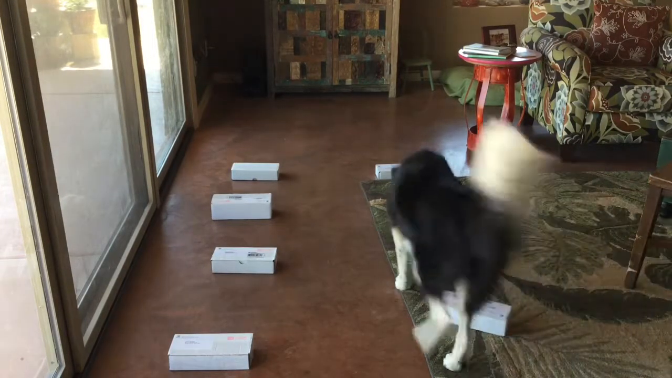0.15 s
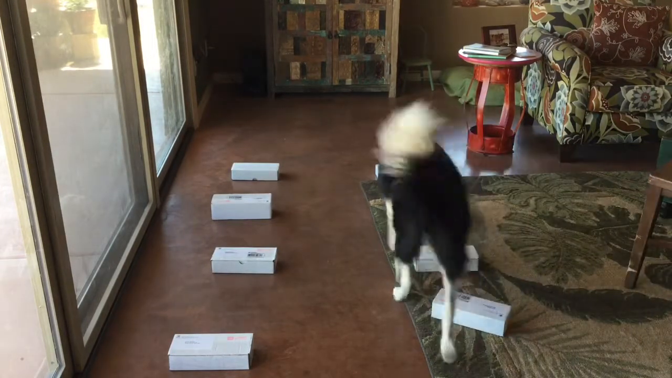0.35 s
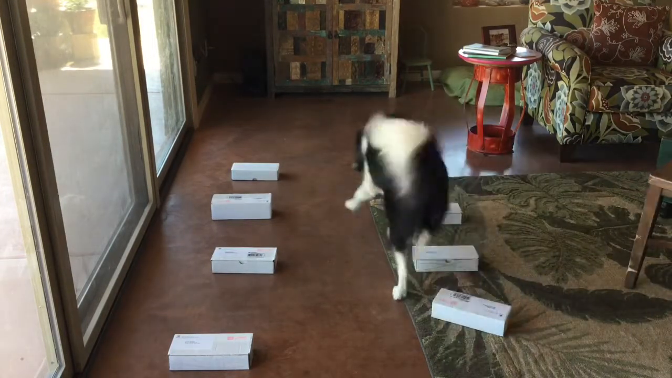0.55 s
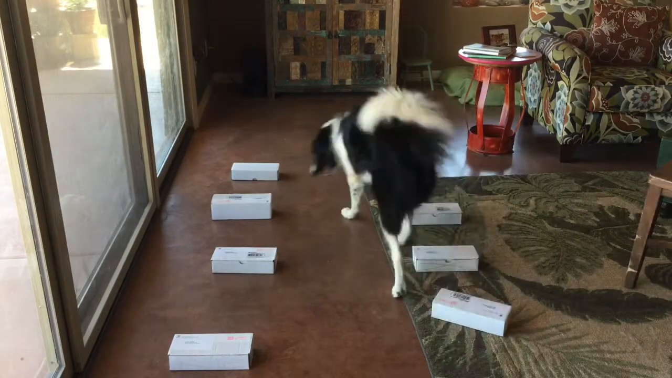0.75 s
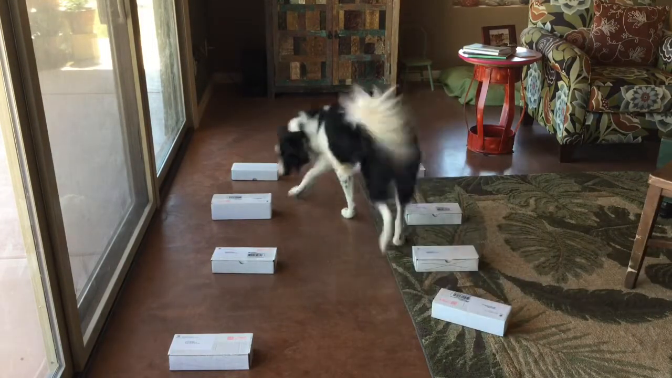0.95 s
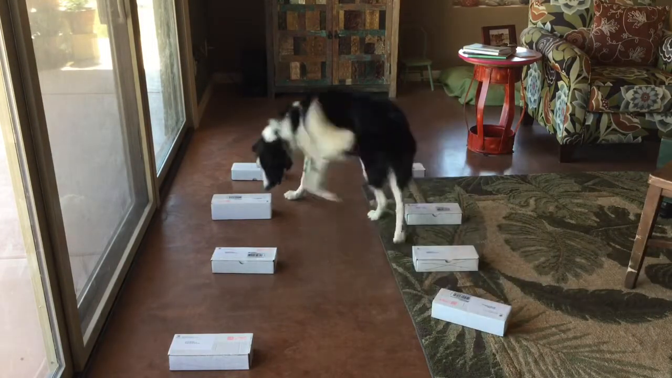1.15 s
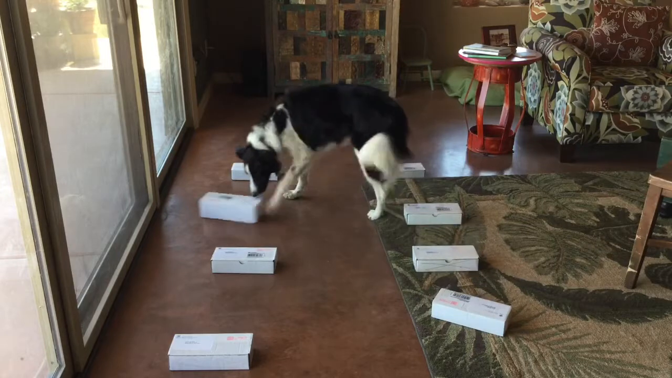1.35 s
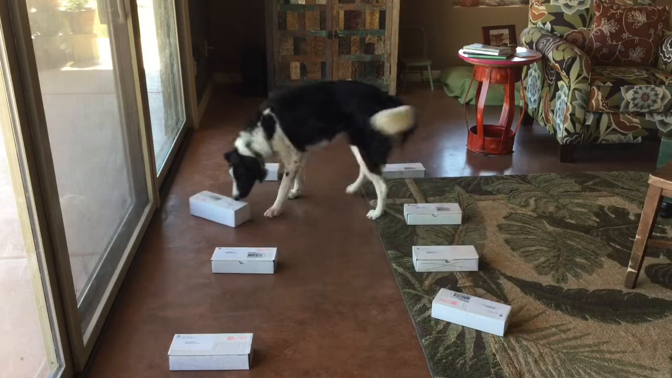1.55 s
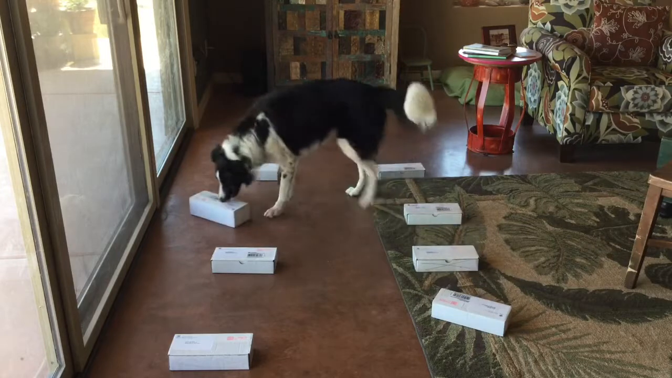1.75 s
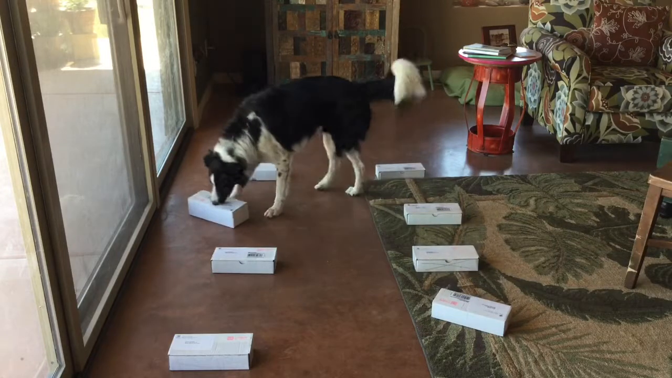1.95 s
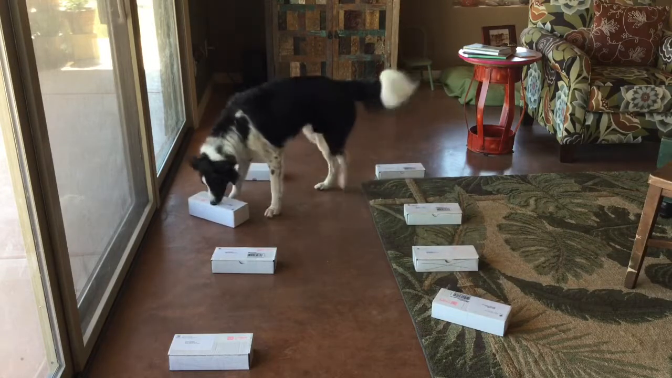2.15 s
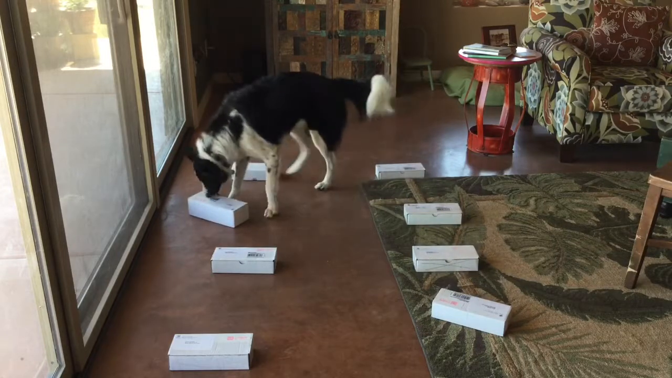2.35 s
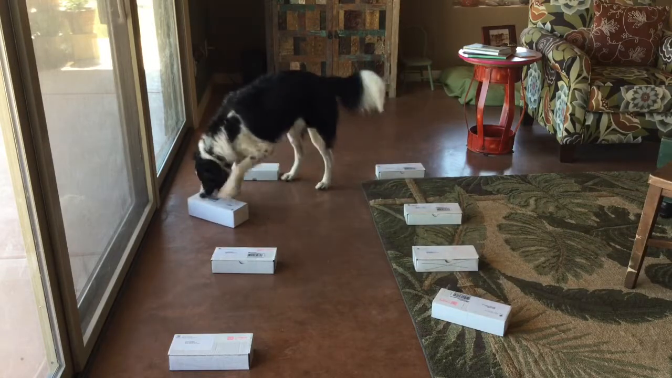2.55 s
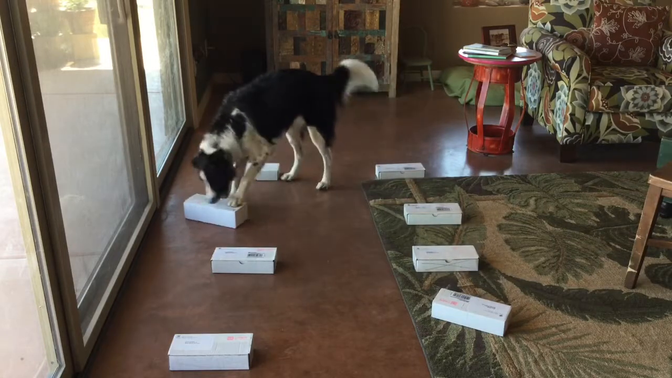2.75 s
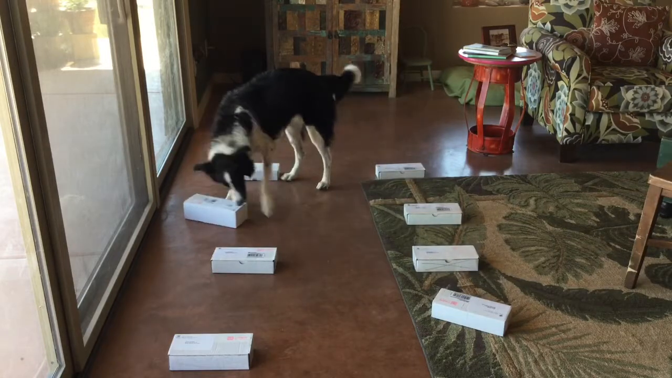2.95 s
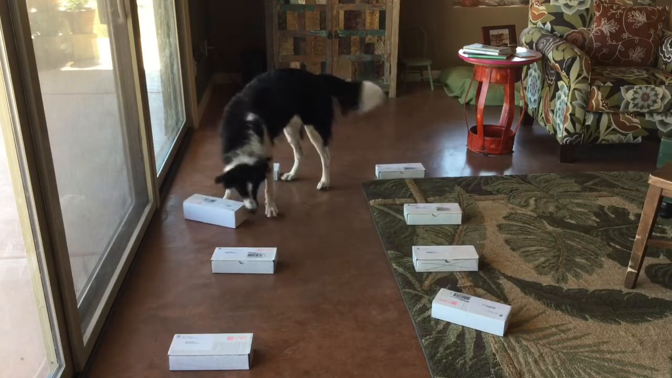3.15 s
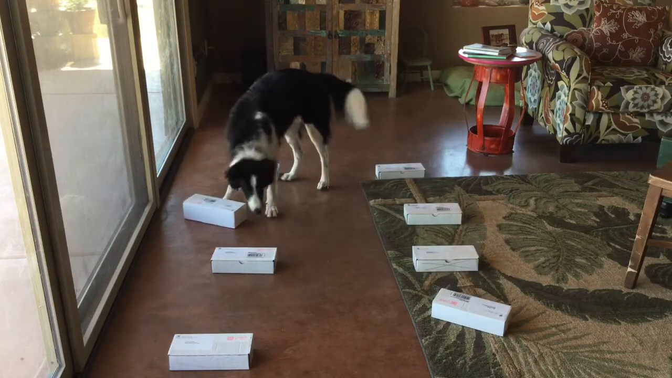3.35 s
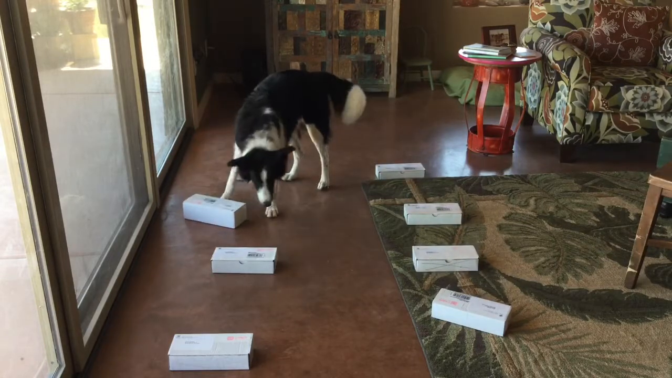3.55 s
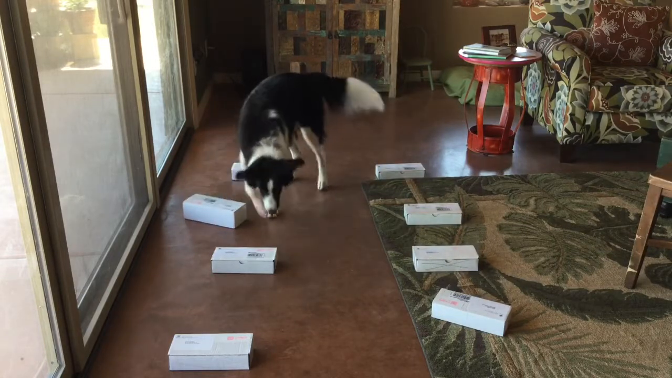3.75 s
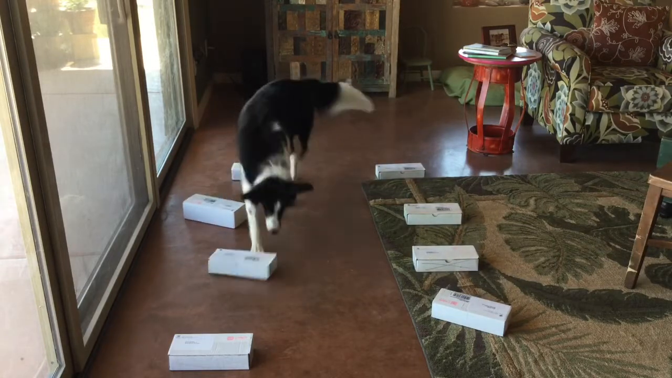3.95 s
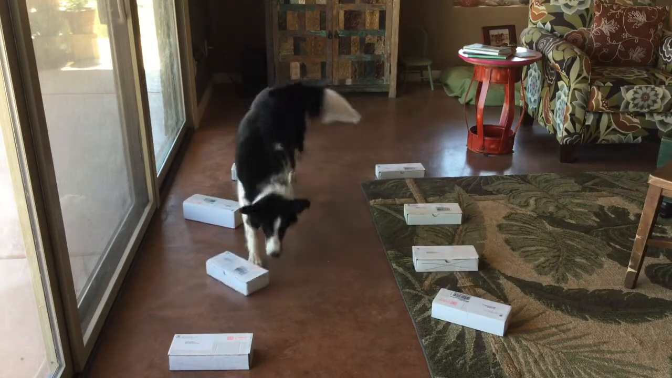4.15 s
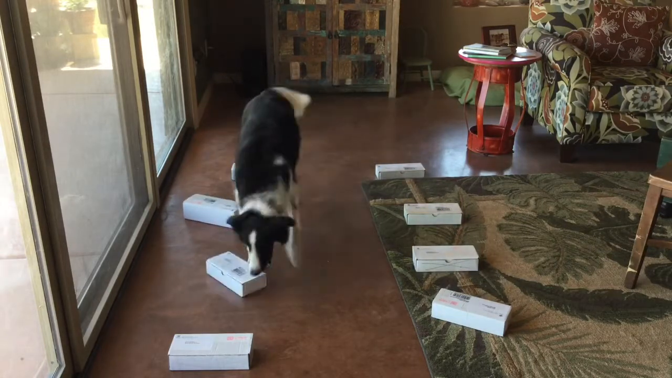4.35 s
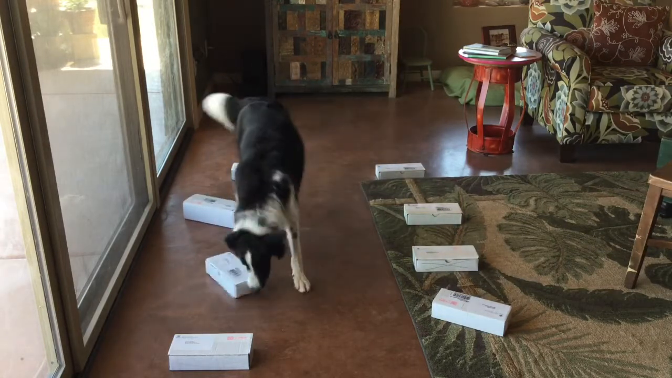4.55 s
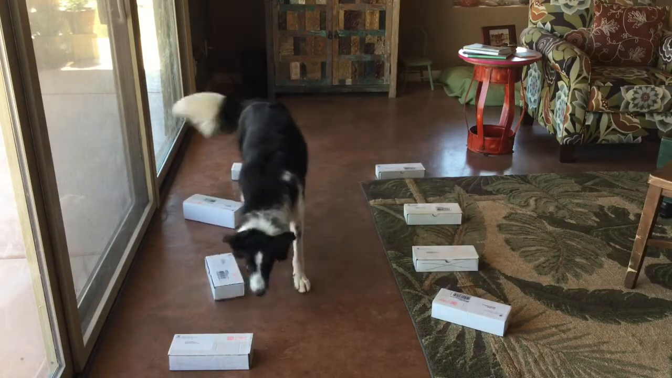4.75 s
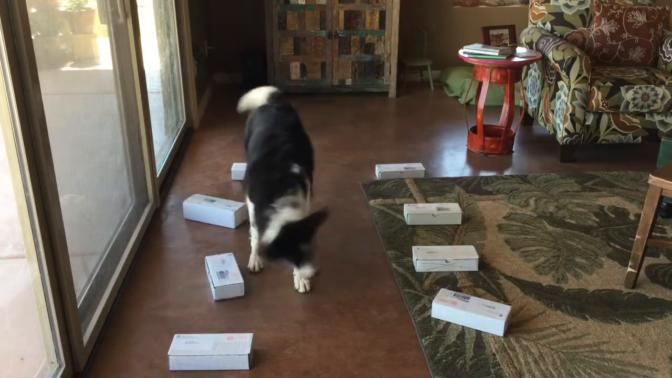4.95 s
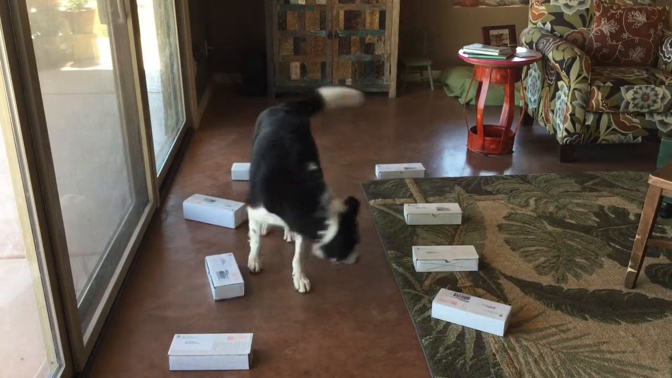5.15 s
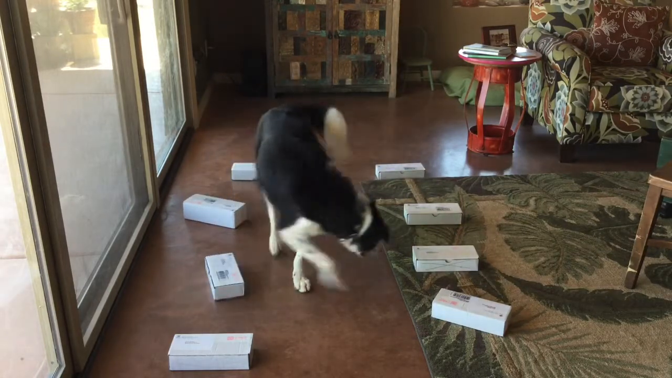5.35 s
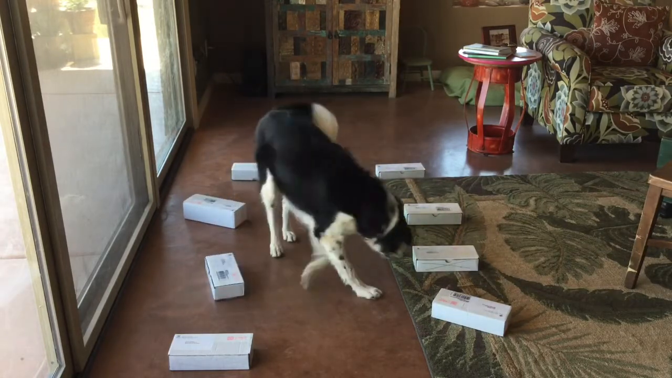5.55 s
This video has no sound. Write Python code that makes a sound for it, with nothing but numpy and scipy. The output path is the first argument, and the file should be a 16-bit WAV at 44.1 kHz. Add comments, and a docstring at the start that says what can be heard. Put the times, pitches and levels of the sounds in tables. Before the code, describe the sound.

Scattered hollow knocks and brief slides of cardboard boxes pushed by a dog, its claws ticking over a quiet room rumble.

```python
"""A hollow cardboard knock over a quiet rumble: a dog is nosing small boxes across a hard floor in a
lively living room, a few metres from a phone microphone. Each blow rings a box's panels and cavity for
a moment, sliding edges hiss and shake the panels, and claws tick on the floor. A glass door and a wall
nearby throw back two early echoes, then the room's tail follows."""
import sys
import numpy as np
from scipy import signal
from scipy.fft import rfft, irfft
from scipy.io import wavfile
from scipy.ndimage import uniform_filter1d

SR = 44100
rng = np.random.default_rng(int(sys.argv[2]) if len(sys.argv) > 2 else 0)


def materialize(psi):
    """Save the field psi as 16-bit PCM at rate SR to the path in sys.argv[1].

    A 1-D psi becomes a single channel; in a 2-D psi each row is a channel.
    """
    bounded = np.clip(np.atleast_2d(psi).T, -1, 1)
    quanta = np.round(bounded * 32767).astype(np.int16)
    wavfile.write(sys.argv[1], SR, quanta)


N = 246871

# Spectrum of the room tone: frequency_hz, relative_density_db
ROOM_TONE_SPECTRUM = [(15, -34), (25, -9.5), (80, 2), (200, -11), (335, -10.5), (489, -21), (607, -11.5),
                      (714, -20), (1440, -16.5), (2050, -16.5), (2690, -26.5), (3160, -24.5), (5880, -39),
                      (11900, -42.5), (16000, -50)]
# Bands of the living room's tail: centre_hz, t60_s, relative_level_db
TAIL_BANDS = [(150, 0.35, -2.5), (370, 0.52, 2.5), (910, 0.63, -4), (2140, 0.39, -1), (5460, 0.67, -16),
              (11500, 0.34, -5)]
# Echoes off the glass door and the wall, against the direct sound: delay_s, level_db
ECHOES = [(.0058, -10.5), (0.0119, -9)]
# Spots the dog reaches, each with its own tail level against the direct sound: start_s, tail_db
DOG_SPOTS = [(0, 0), (.8, 0), (1.8, 3), (2.2, 1), (2.56, -1), (3.1, 1.5), (3.8, 2), (4.5, 1)]
# Claws and box edges ticking on the floor: start_s, peak_db
TICKS = [(0.1337, -49.5), (0.4494, -61), (0.919, -54), (1.197, -46.5), (1.225, -49.5), (1.367, -33),
         (1.525, -33), (1.7784, -57), (1.892, -57), (1.925, -53), (1.9868, -46), (2.2504, -40.5),
         (2.4523, -44.5), (2.5102, -58), (2.619, -40), (2.6914, -48), (2.725, -54), (2.9038, -46.5),
         (3.216, -49), (3.3326, -55.5), (3.6894, -62), (4.0023, -66), (4.02, -30), (4.599, -67),
         (5.2895, -50.5), (5.5473, -56.5)]
# Panel and cavity modes of a cardboard box: pitch_hz, t60_s
BOX_MODES = [(143, 0.059), (188, 0.073), (250, 0.025), (325, 0.02), (450, 0.019), (600, 0.027),
             (700, 0.019), (820, 0.012), (1050, 0.02), (1240, 0.017), (1750, 0.011), (2600, 0.0078),
             (3800, 0.0036)]
# Strength of each box mode under a dragging edge: relative_level_db
DRAG_MODES_DB = [-8.5, -4, -14.5, 9, 4, -7, -5.5, 2, 1.5, 7.5, -2, -32, -27]
# Spectrum of cardboard rubbing on the floor: frequency_hz, relative_density_db
HISS_SPECTRUM = [(700, 0), (1500, 3), (3000, -3), (5000, -2), (8000, -6.5), (12000, -6), (15000, -10)]
# A box edge sliding, with the panels' shake (drag) set against the hiss:
# start_s, length_s, hiss_start_db, hiss_end_db, drag_db
SLIDES = [(0.206, 0.052, -78, -78, -10), (1.361, 0.23, -50.5, -55, -5), (1.926, 0.078, -72, -66, 0),
          (2.066, 0.017, -72, -87, 4), (2.635, 0.048, -56.5, -73, 7), (2.692, .035, -64, -57, -5),
          (2.73, 0.01, -50, -55, 5), (2.904, 0.073, -69.5, -71, 5), (3.998, 0.012, -66, -51, -14),
          (4.018, 0.26, -56, -67, 4.5), (4.512, 0.053, -86, -69, -4), (4.597, 0.044, -58.5, -71, 10),
          (4.645, 0.1, -63.5, -64, -3.5)]
# Blows on a box. The spot hit picks a low (thump), middle (panel) and high (snap) region of modes, the
# last two set against the thump: start_s, peak_db, thump_hz, panel_hz, snap_hz, panel_db, snap_db
KNOCKS = [(0.13, -24, 413, 1050, 1720, -7, -22.5), (0.393, -52, 300, 1240, 1750, -17, -23),
          (1.3664, -24, 250, 705, 1020, 8.5, 10), (1.654, -49.5, 150, 330, 1100, -14, -20),
          (1.887, -52.5, 300, 700, 1110, -4.5, -3), (1.925, -44.5, 476, 1080, 1830, 6.5, 8.5),
          (1.94, -37.5, 455, 780, 1120, 23.5, 6), (1.962, -61, 450, 710, 1750, 9, -1),
          (1.984, -45.5, 570, 1064, 1730, 10.5, 9), (2.252, -35.5, 270, 331, 594, 4, -9.5),
          (2.304, -47, 258, 318, 594, -0.5, -5.5), (2.62, -27.5, 414, 572, 1860, 3, -5),
          (2.694, -39, 460, 620, 1900, -19, -16), (2.727, -16.5, 173, 824, 1710, -0.5, -6),
          (3.16, -45, 150, 420, 745, -1, -12.5), (3.182, -41.5, 195, 357, 2000, 13, -24),
          (3.21, -41.5, 194, 387, 665, -3, -6.5), (3.331, -49.5, 143, 650, 1100, 2, -3),
          (4.0064, -34, 270, 600, 1770, -22, -5), (4.02, -17.5, 296, 1291, 2530, 18, 9),
          (4.1941, -37, 325, 1140, 2600, -3.5, -30), (4.6023, -32.5, 144, 370, 1210, 8, -2)]


def undb(db):
    """Decibels to gain."""
    return 10 ** (np.asarray(db) / 20)


def unit(x):
    """Scale x to an rms of 1."""
    return x / np.sqrt(np.mean(x ** 2))


def decay(t, t60_s):
    """An envelope that falls 60 dB in t60_s."""
    return np.exp(-np.log(1000) * t / t60_s)


def log_bins(x):
    """Log frequency of each bin in the spectrum of x."""
    return np.log(np.maximum(np.arange(len(x) // 2 + 1) * SR / len(x), 1))


def colour(x, points):
    """Shape x by (frequency_hz, level_db) points joined on a log axis."""
    hz, db = np.transpose(points)
    gain = undb(np.interp(log_bins(x), np.log(hz), db, left=-90))
    return irfft(rfft(x) * gain, len(x))


def bands(x, centres_hz):
    """Split x into overlapping bands that add up to x."""
    shares = [np.interp(log_bins(x), np.log(centres_hz), row) for row in np.eye(len(centres_hz))]
    return np.array([irfft(rfft(x) * share, len(x)) for share in shares])


def wander(rate_hz):
    """Random steps at rate_hz, smoothed twice; rms 1."""
    hold = int(SR / rate_hz)
    steps = np.repeat(rng.standard_normal(N // 128)[:N // hold + 1], hold)
    return unit(uniform_filter1d(uniform_filter1d(steps, hold), hold)[:N])


def add(out, start_s, x):
    """Mix x into out from start_s, as far as it fits."""
    i = int(start_s * SR)
    out[i:i + len(x)] += x[:len(out) - i]


def room_tone(level_db=-60, swell_db=1.5, flicker_db=0.66, bass_flicker_db=2.0, bass_hz=300):
    """Rumble and faint hiss of the house; the bands swell together and the bass flickers most."""
    centres_hz = 40 * 2 ** np.arange(0, 9, .75)
    parts = bands(colour(rng.standard_normal(N), ROOM_TONE_SPECTRUM), centres_hz)
    swell = swell_db * wander(rate_hz=1.41)
    depths_db = flicker_db + bass_flicker_db / (1 + (centres_hz / bass_hz) ** 2)
    tone = sum(part * undb(swell + depth * wander(rate_hz=12)) for part, depth in zip(parts, depths_db))
    return undb(level_db) * unit(tone)


def room_response(tail_db, build_s=0.0068):
    """From floor to microphone: direct sound, two clear echoes, a dense tail that dies band by band."""
    t = np.arange(SR) / SR
    hz, t60_s, db = np.transpose(TAIL_BANDS)[:, :, None]
    tails = bands(rng.standard_normal(SR), hz[:, 0]) * decay(t, t60_s) * undb(db)
    tail = tails.sum(axis=0) * np.clip(t / build_s, 0, 1) ** 2
    response = undb(tail_db) * tail / np.sqrt(np.sum(tail ** 2))
    response[0] = 1  # direct sound
    for delay_s, level_db in ECHOES:
        response[int(delay_s * SR)] += undb(level_db)
    return response


def floor_ticks(low_hz=4047, scuff_t60_s=0.034, scuff_db=-17):
    """A claw or box edge meets the hard floor: one sharp impulse, then a short scuff."""
    out, t = np.zeros(N), np.arange(4096) / SR
    treble = signal.butter(2, [low_hz, .45 * SR], "band", fs=SR)
    for start_s, peak_db in TICKS:
        impulse = t == 0
        scuff = undb(scuff_db) * rng.standard_normal(len(t)) * decay(t, scuff_t60_s)
        tick = signal.lfilter(*treble, impulse + scuff)
        add(out, start_s, undb(peak_db) * tick / np.abs(tick).max())
    return out


def box_ring(mode_db, detune=0, rise_s=0.00092):
    """The box modes after one blow, peak 1; the soft nose or paw takes a moment to push."""
    t = np.arange(SR // 8) / SR
    hz, t60_s = np.transpose(BOX_MODES)[:, :, None]
    modes = np.sin(2 * np.pi * hz * (1 + detune) * t) * decay(t, t60_s)
    push = 1 - np.exp(-t / rise_s)
    ring = push * (undb(mode_db) @ modes)
    return ring / np.abs(ring).max()


def fibre_friction(grain_db=3.0, stutter_db=3.0):
    """Dense clicks of cardboard fibres, uneven in size; the edge catches and lets go."""
    clicks = rng.standard_normal(N) * undb(grain_db * rng.exponential(size=N))
    return clicks * undb(stutter_db * wander(rate_hz=35))


def box_slides(onset_s=0.0023, stop_db_per_s=249):
    """Friction on the floor hisses and shakes the panels, then fades as the box comes to rest."""
    out, t = np.zeros(N), np.arange(SR // 2) / SR
    hiss = unit(colour(fibre_friction(), HISS_SPECTRUM))
    drag = unit(signal.fftconvolve(fibre_friction(), box_ring(DRAG_MODES_DB))[:N])
    onset = np.clip(t / onset_s, 0, 1)
    for start_s, length_s, hiss_start_db, hiss_end_db, drag_db in SLIDES:
        hiss_db = np.interp(t, [0, length_s], [hiss_start_db, hiss_end_db])
        hiss_db -= stop_db_per_s * np.maximum(t - length_s, 0)
        now = slice(int(start_s * SR), int(start_s * SR) + len(t))
        add(out, start_s, onset * undb(hiss_db) * (hiss[now] + undb(drag_db) * drag[now]))
    return out


def struck_region(centre_hz, below_db_per_oct, above_db_per_oct):
    """Gain of each box mode, weaker the further its pitch lies from the struck region."""
    octaves = np.log2(np.transpose(BOX_MODES)[0] / centre_hz)
    return undb(np.minimum(below_db_per_oct * octaves, -above_db_per_oct * octaves))


def box_knocks(detune_spread=0.054):
    """The dog knocks a hollow box; every blow bends the cardboard differently, so the modes shift."""
    out = np.zeros(N)
    for start_s, peak_db, thump_hz, panel_hz, snap_hz, panel_db, snap_db in KNOCKS:
        thump = struck_region(thump_hz, below_db_per_oct=15.5, above_db_per_oct=38)
        panel = undb(panel_db) * struck_region(panel_hz, below_db_per_oct=82, above_db_per_oct=72)
        snap = undb(snap_db) * struck_region(snap_hz, below_db_per_oct=50, above_db_per_oct=2)
        mode_db = 20 * np.log10(thump + panel + snap)
        detune = detune_spread * rng.standard_normal((len(BOX_MODES), 1))
        add(out, start_s, undb(peak_db) * box_ring(mode_db, detune))
    return out


def scene(box_low_hz=121):
    """The dog a few metres off, over the room tone; the room answers each spot in its own way."""
    # a small box radiates little bass
    radiation = signal.butter(2, box_low_hz, "high", fs=SR, output="sos")
    boxes = signal.sosfilt(radiation, box_knocks() + box_slides())
    dog = boxes + floor_ticks()
    out = room_tone()
    ends_s = [start_s for start_s, _ in DOG_SPOTS[1:]] + [N / SR]
    for (start_s, tail_db), end_s in zip(DOG_SPOTS, ends_s):
        at_spot = dog[int(start_s * SR):int(end_s * SR)]
        add(out, start_s, signal.fftconvolve(at_spot, room_response(tail_db)))
    return out[None]


def record(dry):
    """The phone's mono microphone drops the deepest bass and cuts the top."""
    low_hz, top_hz = 54, 15400
    low_cut = signal.butter(3, low_hz, "high", fs=SR, output="sos")
    top_cut = signal.ellip(8, .2, 70, top_hz, fs=SR, output="sos")
    return signal.sosfilt(top_cut, signal.sosfilt(low_cut, dry))


dry = scene()
out = record(dry)
materialize(out)
```